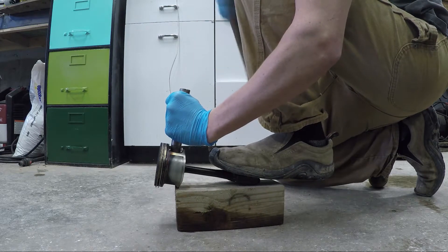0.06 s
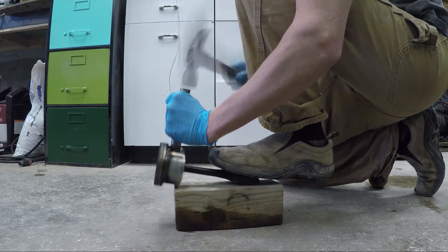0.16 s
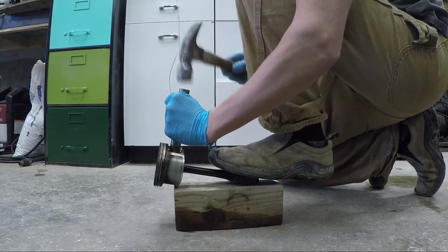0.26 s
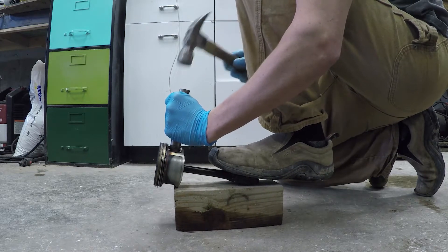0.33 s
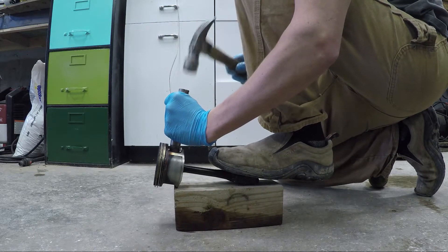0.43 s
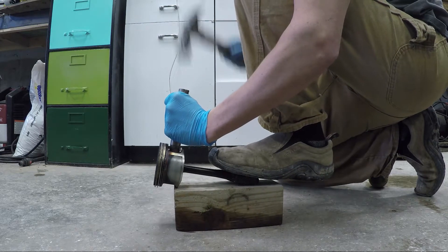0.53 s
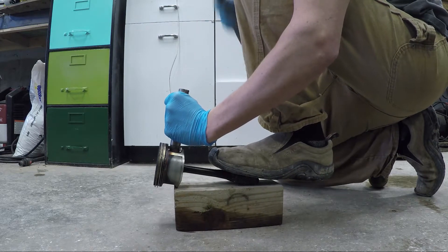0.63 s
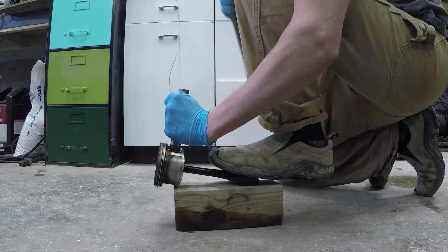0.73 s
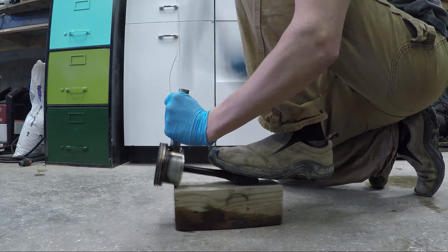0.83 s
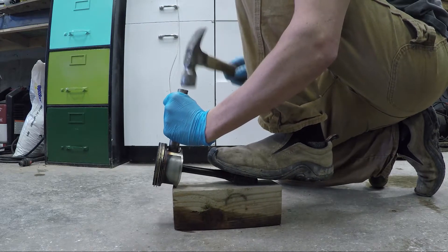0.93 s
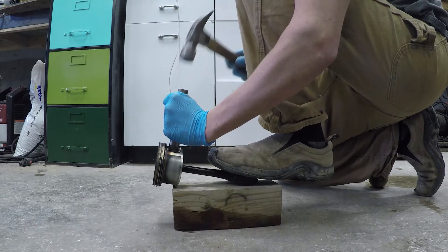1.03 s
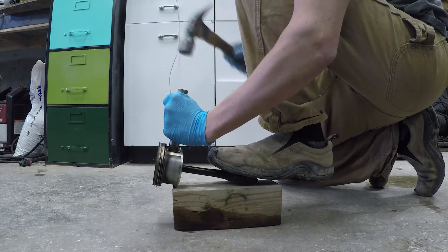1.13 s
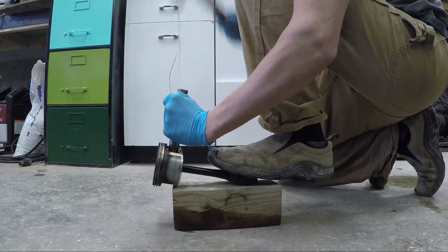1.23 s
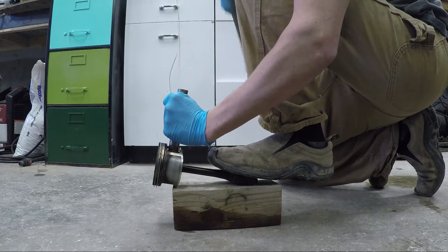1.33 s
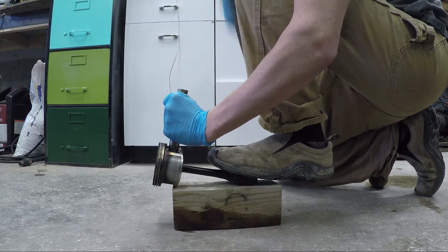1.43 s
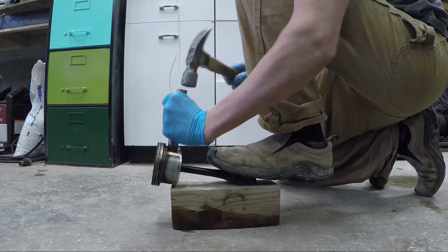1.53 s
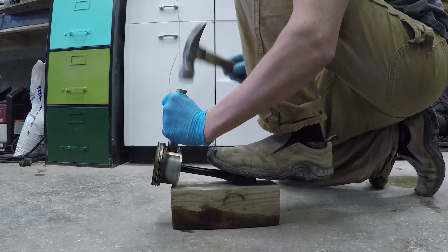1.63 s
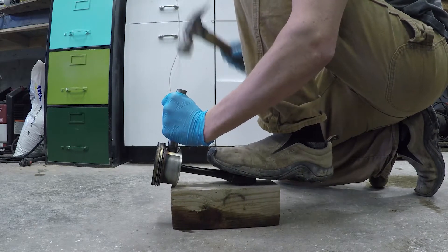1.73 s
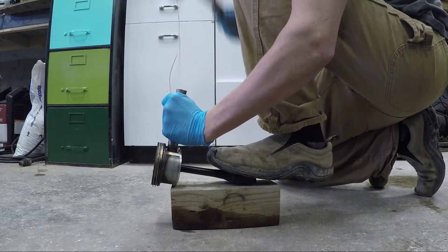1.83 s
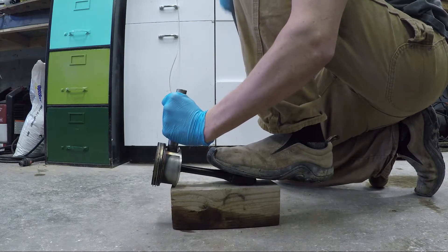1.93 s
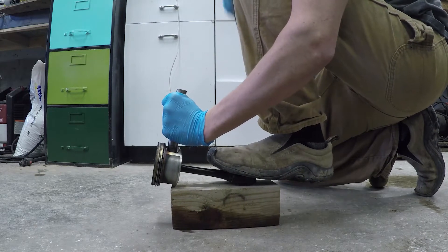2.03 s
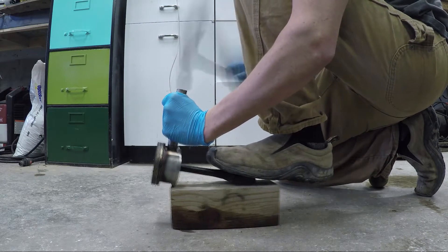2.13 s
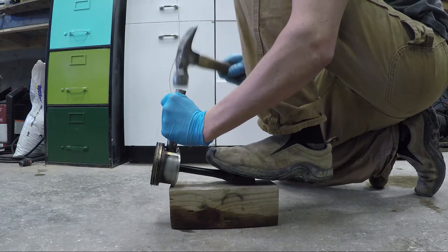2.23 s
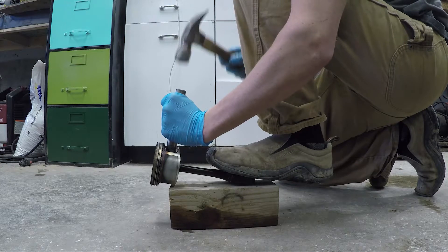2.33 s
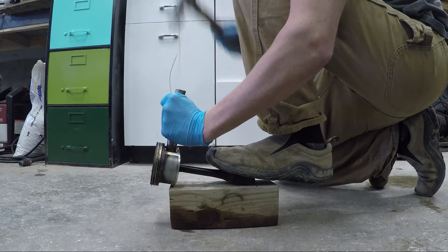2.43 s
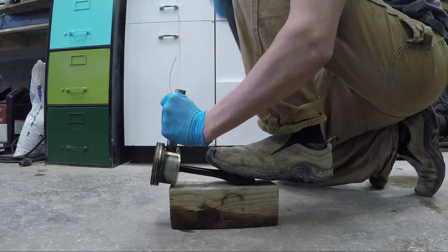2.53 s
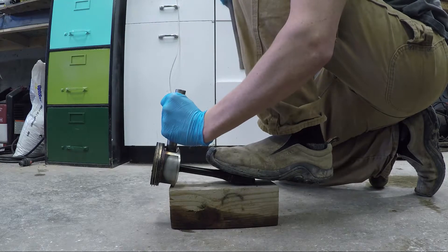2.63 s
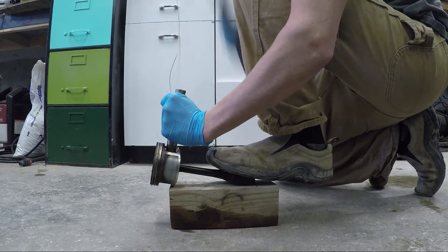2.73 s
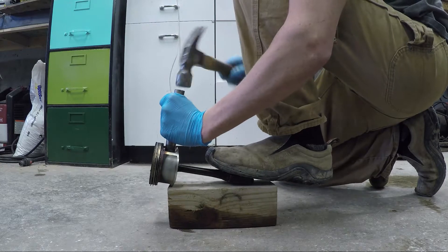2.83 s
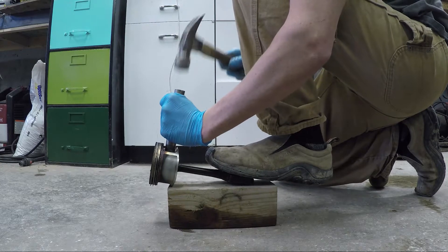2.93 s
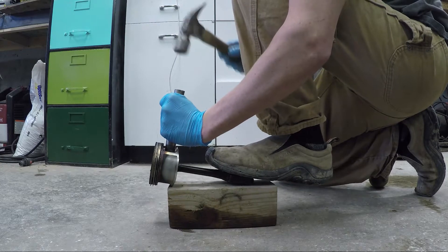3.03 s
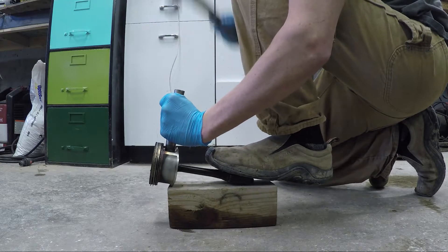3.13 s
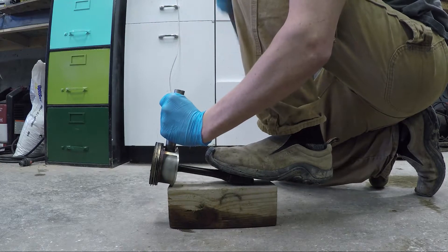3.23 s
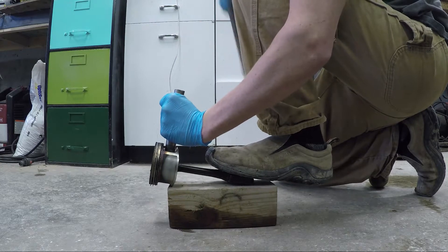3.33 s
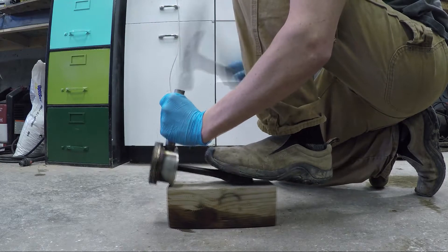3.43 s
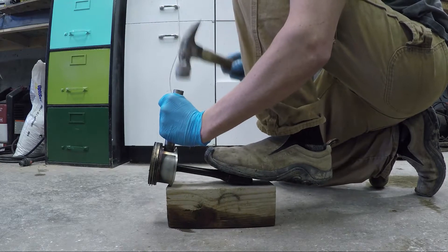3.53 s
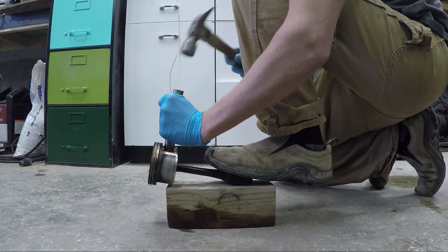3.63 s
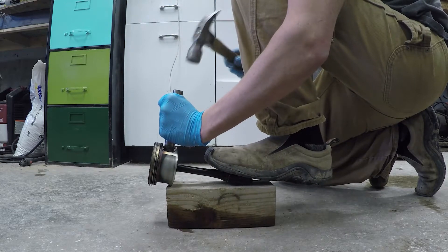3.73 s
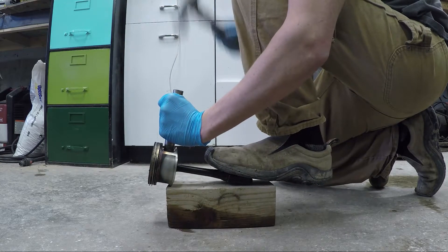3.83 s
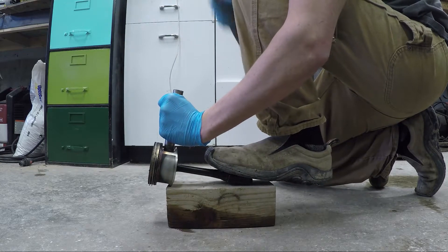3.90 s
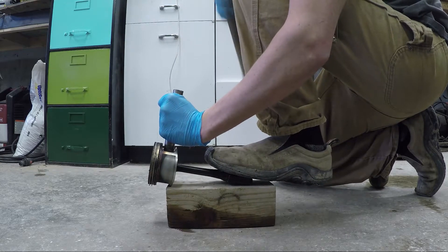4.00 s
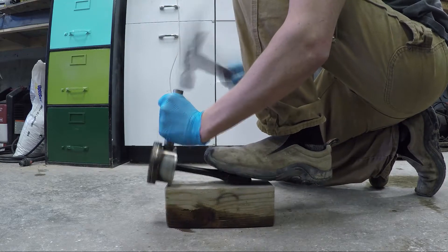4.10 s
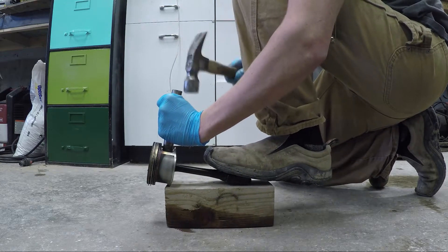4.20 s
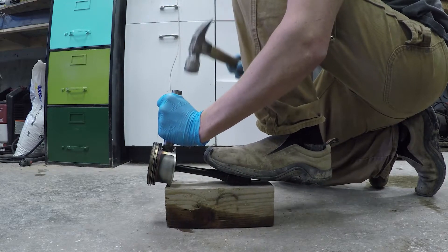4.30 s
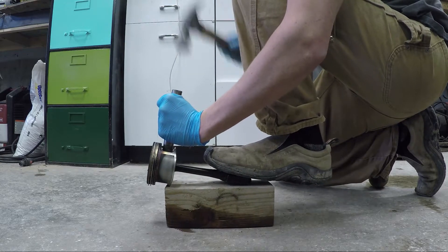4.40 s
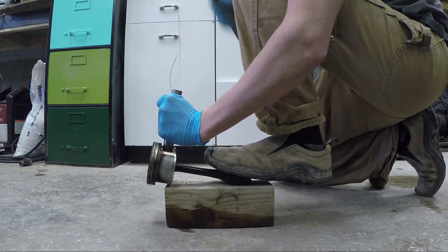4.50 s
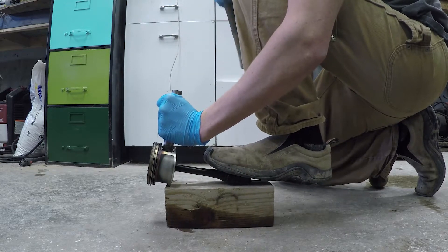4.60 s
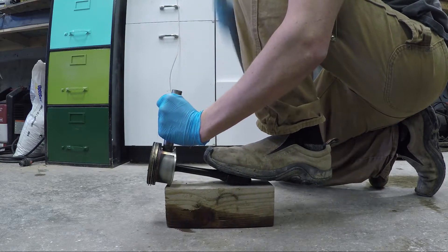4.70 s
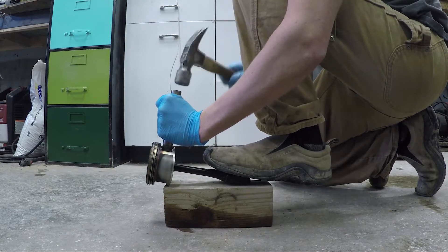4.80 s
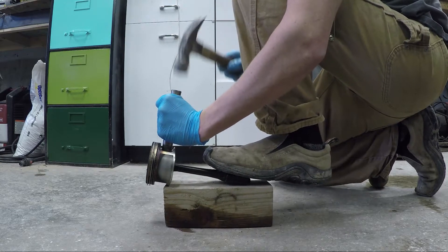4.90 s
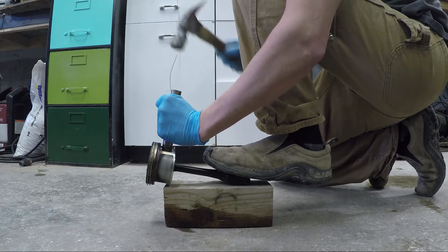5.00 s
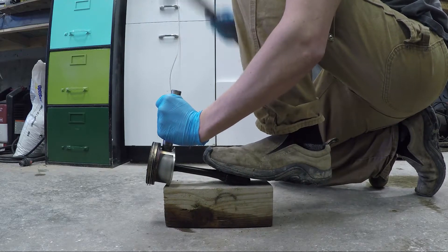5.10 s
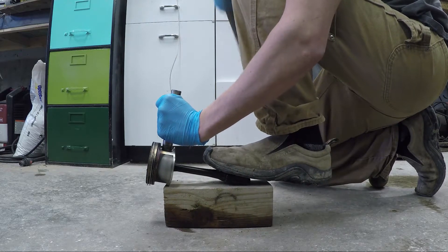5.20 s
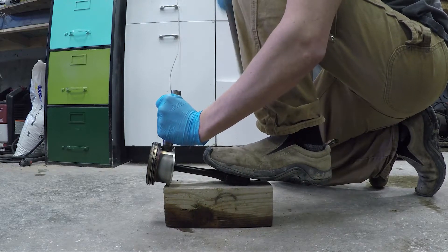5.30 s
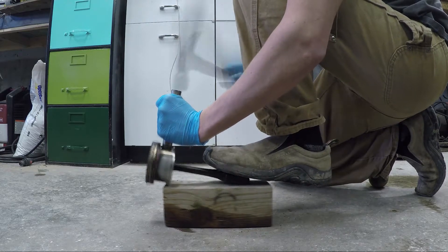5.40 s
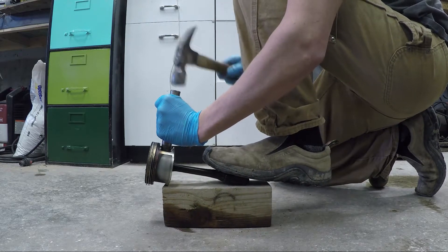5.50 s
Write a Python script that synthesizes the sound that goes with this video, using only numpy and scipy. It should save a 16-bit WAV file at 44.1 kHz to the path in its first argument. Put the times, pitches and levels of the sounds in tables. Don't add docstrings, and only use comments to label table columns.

```python
import sys
import numpy as np
from scipy import signal
from scipy.fft import rfft, irfft
from scipy.io import wavfile

SR = 44100
rng = np.random.default_rng(int(sys.argv[2]) if len(sys.argv) > 2 else 0)


def amplitude_ratio(level_db):
    exponent = np.asarray(level_db, float) / 20
    return 10 ** exponent


def master(y):
    cut = np.clip(np.atleast_2d(y).T, -1, 1)
    pcm = np.round(cut * 32767)
    wavfile.write(sys.argv[1], SR, pcm.astype(np.int16))


N = 244931
LEAD = int(.6 * SR)
THUMP_LAG_S = .0022

BLOW_TIMES = [-.46, .2055, .8884, 1.5498, 2.184, 2.8214, 3.4822, 4.1428, 4.8101, 5.4517]
# strength/dB, punch ring/dB, glance/dB, push into the floor/dB
BLOW_LANDINGS = [
    (1.5, -2, -2, -12),
    (4, -2.5, -6.5, -1),
    (4, -3.5, 0, 0),
    (4.5, -2, -0.5, -0.5),
    (1, 0, -1, -2.5),
    (1.5, 0, 3, -15.5),
    (3, -2, 0, -13.5),
    (3, -5, 3.5, -7.5),
    (0.5, -2, 3, -16.5),
    (3, -2.5, -1, -19),
]


def at_hz(points, hz):
    table_hz, values = np.array(points).T
    return np.interp(np.log(np.maximum(hz, 1)), np.log(table_hz), values)


def rms_one(x):
    return x / np.sqrt(np.mean(x ** 2) + 1e-20)


def coloured(spectrum, size):
    hz = np.arange(size // 2 + 1) * SR / size
    white = rfft(rng.standard_normal(size))
    return rms_one(irfft(white * amplitude_ratio(at_hz(spectrum, hz)), size))


def ring(modes, t, scatter_db, rise_s, phase_spread):
    hz, level_db, t60 = np.array(modes).T[:, :, None]
    chance = rng.standard_normal((2, len(modes), 1))
    fade = amplitude_ratio(level_db + scatter_db * chance[0] - 60 * t / t60)
    waves = np.sin(2 * np.pi * hz * t + phase_spread * chance[1])
    return (1 - np.exp(-t / rise_s)) * np.sum(fade * waves, axis=0)


def add(track, s, sound):
    at = LEAD + int(round(s * SR))
    track[at:at + len(sound)] += sound[:len(track) - at]


def workshop_hum():
    # f/Hz, level/dB per Hz
    hum_spectrum = [(15, -28.5), (25, -0.5), (137, 7.5), (286, -9), (394, -11.5), (1290, -25.5),
                    (2160, -34), (3280, -39), (9000, -48.5), (11700, -79.5), (19800, -120)]
    return amplitude_ratio(-53) * coloured(hum_spectrum, N)


def workshop(x):
    # f/Hz, t60/s
    room_t60 = [(40, 1.3), (200, 1.5), (420, 1.07), (1450, 1.1234), (2900, 0.7952), (5000, 0.7449),
                (7500, 0.4977), (14000, 0.34)]
    # f/Hz, level/dB
    room_db = [(40, -10.5), (120, -13), (300, -9), (600, 6.5), (1300, -2.5), (2500, -7.5), (5000, -4),
               (12000, -2)]
    t = np.arange(int(1.5 * SR)) / SR
    edges = 30 * 2 ** np.arange(0, 9.3, 1 / 3)
    white = rng.standard_normal((2, len(t)))
    response = 0
    for k, (low, high) in enumerate(zip(edges, edges[1:])):
        band_filter = signal.butter(2, [low, high], "band", fs=SR, output="sos")
        band = signal.sosfilt(band_filter, white[k % 2])
        hz = np.sqrt(low * high)
        near_wash = amplitude_ratio(-18.0 - 60 * t / 0.59)
        near_wash = near_wash + amplitude_ratio(3.5 - 60 * t / 0.11) * np.minimum(hz / 8000.0, 1)
        late_tail = amplitude_ratio(-60 * t / at_hz(room_t60, hz))
        response = response + band * amplitude_ratio(at_hz(room_db, hz)) * (late_tail + near_wash)
    build_up = 1 - np.exp(-t / 0.0032)
    return signal.fftconvolve(x, response * build_up)[:len(x)]


def standing_waves():
    # f/Hz, level/dB, t60/s
    room_modes = [(62, -2, 0.43), (100.8, -11, 0.61), (115.4, -1, 0.63), (136.8, 1, .8), (179, -5.5, 0.86),
                  (189, -2, 0.92), (246.7, -5.5, 0.61), (275.4, -13, 0.51)]
    out, t = np.zeros(LEAD + N), np.arange(SR) / SR
    for s, (db, _, _, push_db) in zip(BLOW_TIMES, BLOW_LANDINGS):
        swell = ring(room_modes, t, scatter_db=4.0, rise_s=.015, phase_spread=0.57)
        swell_db = -31.5 + db + 0.11 * push_db
        add(out, s + THUMP_LAG_S, amplitude_ratio(swell_db) * swell)
    return out


def thump(t, db, push_db):
    # f/Hz, level/dB, t60/s
    slab_modes = [(110, -1.5, 0.087), (157.9, -3.5, 0.1), (195.8, -8, 0.1), (253.2, -2.5, 0.082),
                  (269, -15.5, 0.096)]
    push = np.sin(np.pi * np.minimum(t / 0.007, 1)) ** 2
    knock = ring(slab_modes, t, scatter_db=2.7, rise_s=0.0018, phase_spread=0.083)
    return amplitude_ratio(push_db) * push + amplitude_ratio(db + 0.19 * push_db - 9.0) * knock


def rings(t, punch_db, piston_db, rod_db, head_db):
    # f/Hz, level/dB, t60/s
    punch_modes = [(2430, -1.5, .04), (2590, -.5, .035), (5110, -.5, .035), (5190, -3, .03),
                   (7700, -25, .02), (10200, -26, .02), (12800, -28, .02)]
    piston_modes = [(871, -12, 0.026), (1105, -12, 0.021), (1229.5, -12.5, 0.044), (1277.6, -8.5, 0.047),
                    (1368, -7.5, 0.027), (1551, -7, 0.025), (1942, -9.5, 0.037), (3126, -3, 0.024),
                    (3397, -7, 0.046), (3618, -12, 0.06)]
    rod_modes = [(3750, -9, .022), (4008, -4.5, .03), (5500, -14.5, .022), (7350, -21, .02),
                 (9460, -20, .028), (13950, -23, .015)]
    head_modes = [(4450, -14, .025), (6090, -22, .02), (6530, -4, .025), (6700, -6, .025), (7020, -11, .02),
                  (8900, -20, .02), (10200, -25, .015), (14770, -22, .02)]
    bodies = [(punch_modes, punch_db), (piston_modes, piston_db), (rod_modes, rod_db), (head_modes, head_db)]
    together = 0
    for modes, db in bodies:
        together = together + amplitude_ratio(db) * ring(modes, t, scatter_db=0.0, rise_s=0.000068, phase_spread=3.22)
    return amplitude_ratio(-5.0) * together


def crack(size, spread_s):
    # f/Hz, level/dB per Hz
    crack_spectrum = [(250, -26), (450, -13), (800, -18.5), (1300, -1), (2100, -4), (4000, -1), (6600, -8),
                      (7800, -14.5), (11000, -20), (14500, -25)]
    hz = np.arange(size // 2 + 1) * SR / size
    knots = np.arange(0, SR / 2 + 200, 200)
    path_s = np.minimum(rng.exponential(spread_s, len(knots)), .015)
    delay = np.interp(hz, knots, path_s)
    turn = 2 * np.pi * np.cumsum(delay) * SR / size
    return irfft(amplitude_ratio(at_hz(crack_spectrum, hz)) * np.exp(-1j * turn), size)


def shock(t):
    onset = np.minimum(t / 0.000067, 1)
    return amplitude_ratio(28.0) * crack(len(t), spread_s=.0025) * onset * (t < .2)


def hammering():
    # t/s, click/dB, ring/dB
    rebounds = [
        (.6944, -46, -60),
        (.9452, -8, -16),
        (1.6163, -18, -15),
        (1.9, -38, -55),
        (3.458, -52, -58),
    ]
    shocks, ringing = np.zeros(LEAD + N), np.zeros(LEAD + N)
    t = np.arange(int(.35 * SR)) / SR
    for s, (db, punch_db, glance_db, push_db) in zip(BLOW_TIMES, BLOW_LANDINGS):
        add(shocks, s, amplitude_ratio(db) * shock(t))
        bodies = rings(t, punch_db, piston_db=1.12, rod_db=-1.1 * glance_db, head_db=glance_db)
        add(ringing, s, amplitude_ratio(db) * bodies)
        add(shocks, s + THUMP_LAG_S, thump(t, db, push_db))
    for s, click_db, ring_db in rebounds:
        add(shocks, s, amplitude_ratio(click_db - 10.5) * shock(t))
        bodies = rings(t, punch_db=0, piston_db=-6.5, rod_db=-5.5, head_db=-4.5)
        add(ringing, s, amplitude_ratio(ring_db) * bodies)
    return shocks, ringing


def scene():
    shocks, ringing = hammering()
    tail = amplitude_ratio(-38) * workshop(shocks) + amplitude_ratio(-38.5) * workshop(ringing) + standing_waves()
    blows = shocks + amplitude_ratio(1.5) * ringing + tail
    return (blows[LEAD:] + workshop_hum())[None]


def roll_off(x):
    return signal.sosfilt(signal.butter(12, 16440, fs=SR, output="sos"), x)


def record(dry):
    level_db = 20 * np.log10(np.abs(dry[0]) + 1e-6)
    creep = 53.0 * np.arange(N) / SR
    held_peak_db = np.maximum.accumulate(level_db + creep) - creep
    duck_db = np.maximum(held_peak_db - 7.0, 0)
    lag = np.exp(-1 / (0.018 * SR))
    late_duck_db = signal.lfilter([1 - lag], [1, -lag], duck_db)
    bass_cut = signal.lfilter(*signal.butter(1, 30.0, "high", fs=SR), dry)
    held = bass_cut * amplitude_ratio(-.6 * late_duck_db)
    held = held + amplitude_ratio(-82) * rng.standard_normal(N)
    ceiling, knee = .84, 6.8
    clipped = held / (1 + np.abs(held / ceiling) ** knee) ** (1 / knee)
    top_cut = signal.sosfiltfilt(signal.ellip(8, .1, 35, 15250, fs=SR, output="sos"), clipped)
    return roll_off(top_cut)


dry = scene()
out = record(dry)
master(out)
```